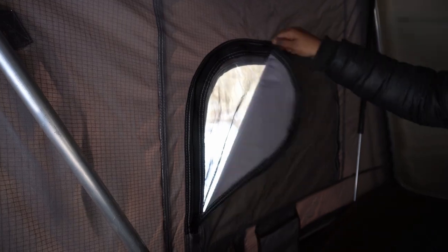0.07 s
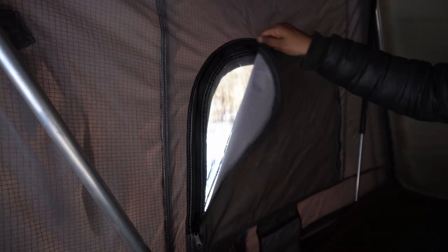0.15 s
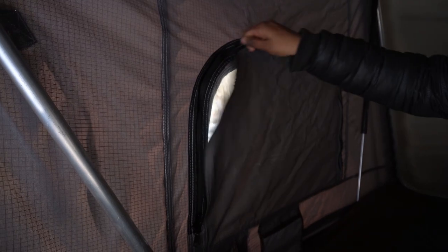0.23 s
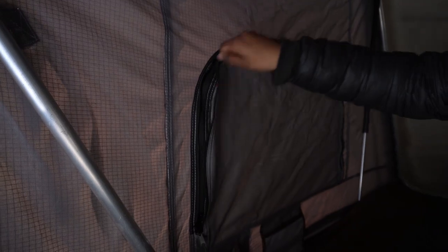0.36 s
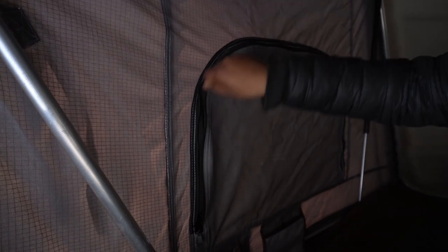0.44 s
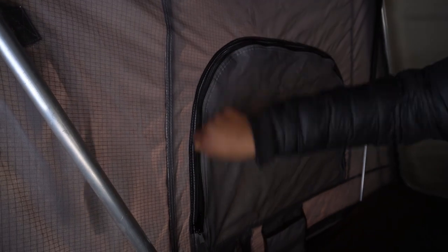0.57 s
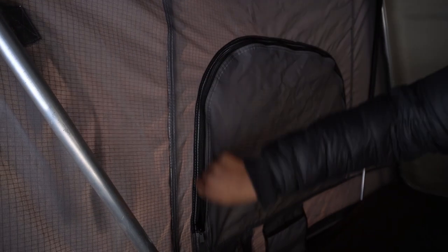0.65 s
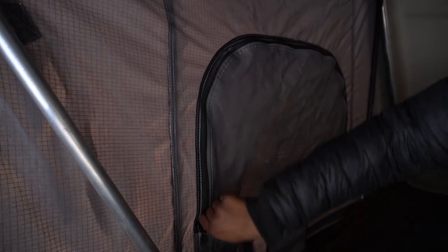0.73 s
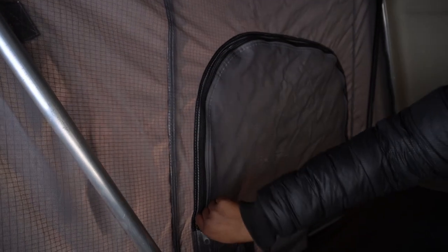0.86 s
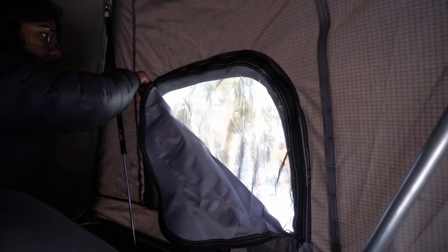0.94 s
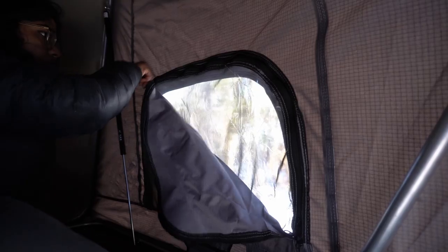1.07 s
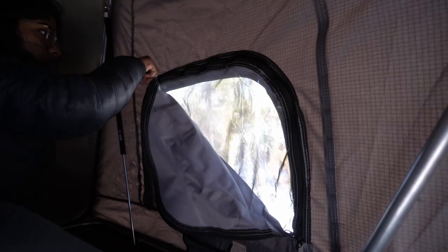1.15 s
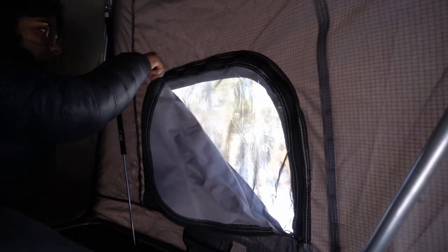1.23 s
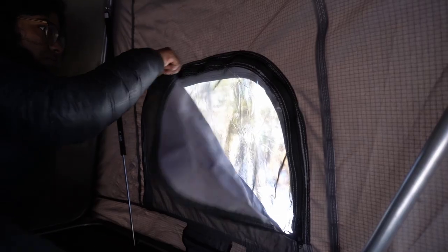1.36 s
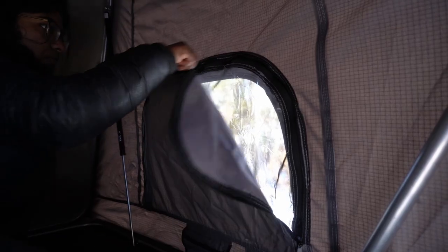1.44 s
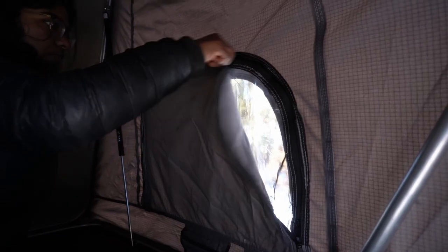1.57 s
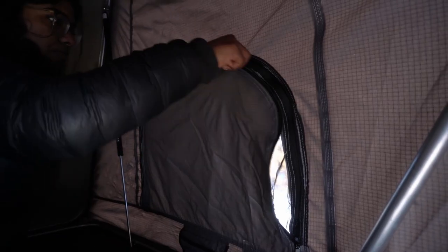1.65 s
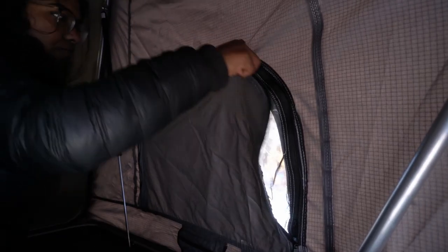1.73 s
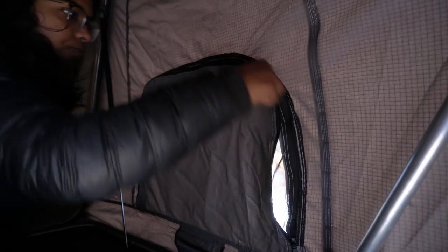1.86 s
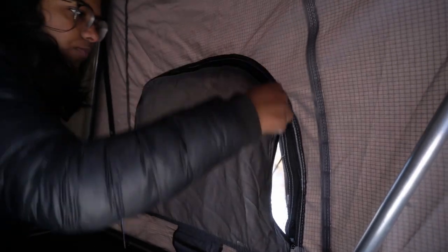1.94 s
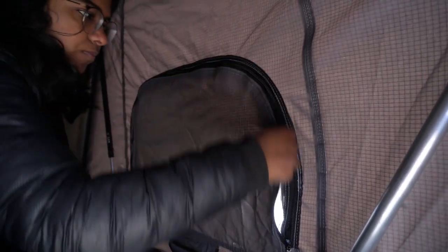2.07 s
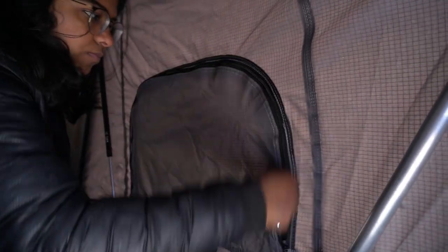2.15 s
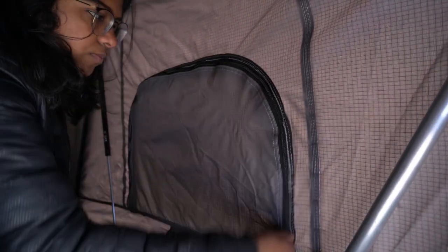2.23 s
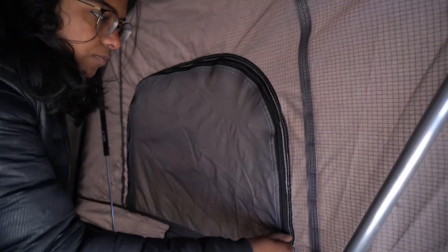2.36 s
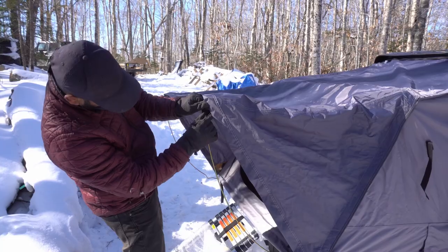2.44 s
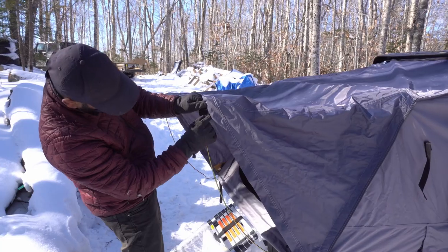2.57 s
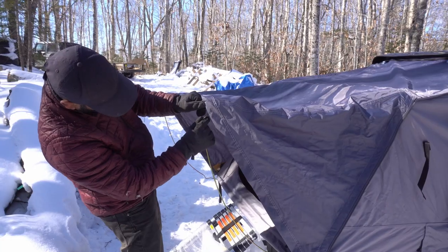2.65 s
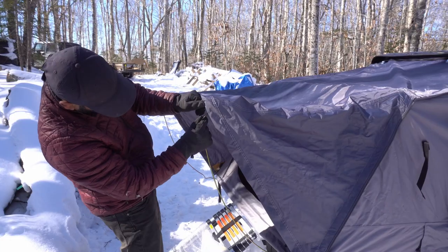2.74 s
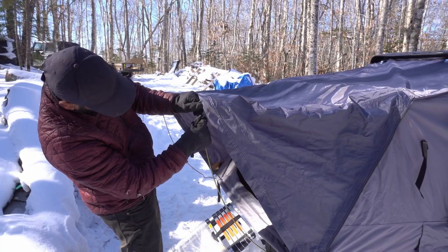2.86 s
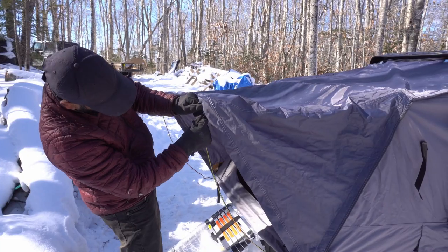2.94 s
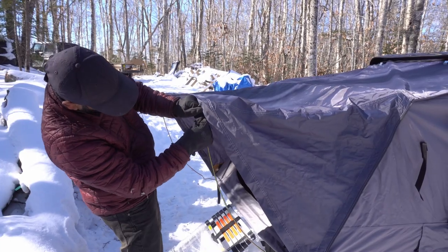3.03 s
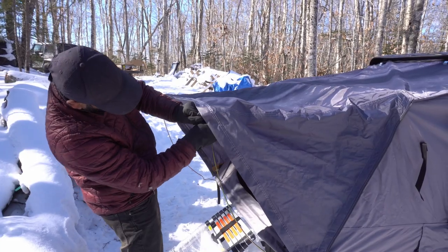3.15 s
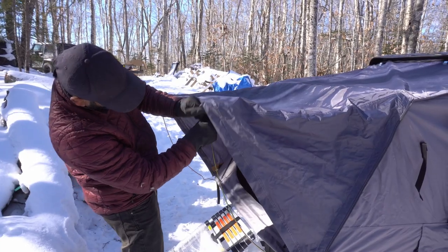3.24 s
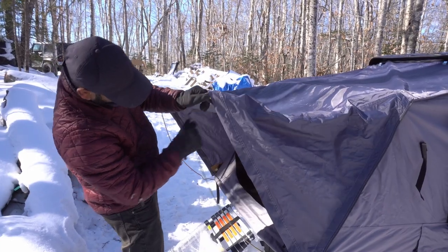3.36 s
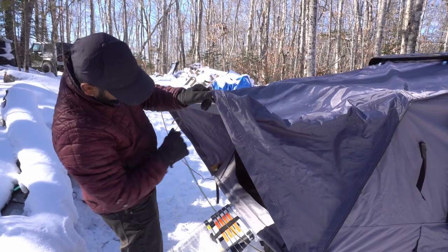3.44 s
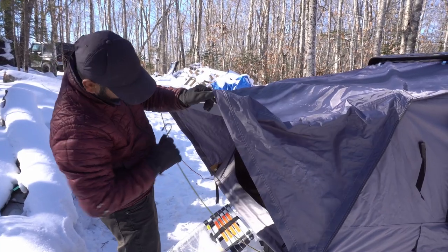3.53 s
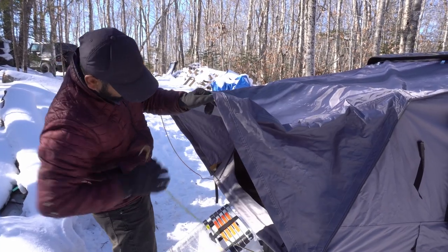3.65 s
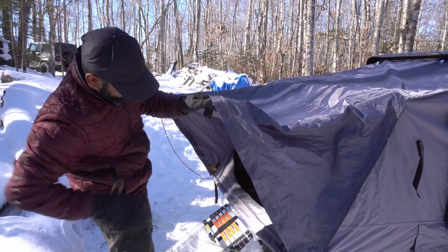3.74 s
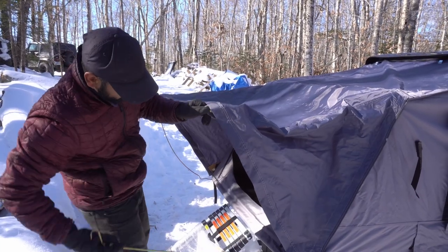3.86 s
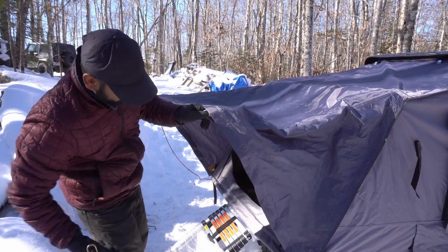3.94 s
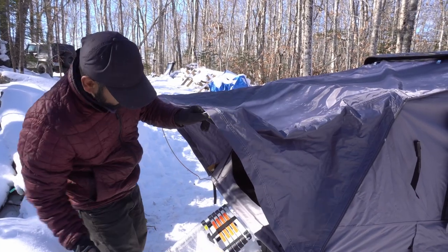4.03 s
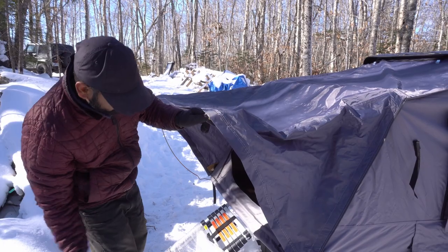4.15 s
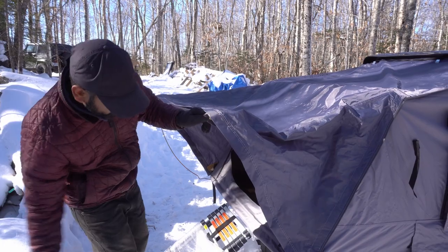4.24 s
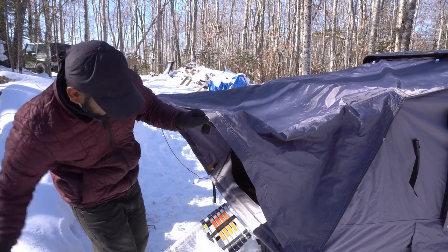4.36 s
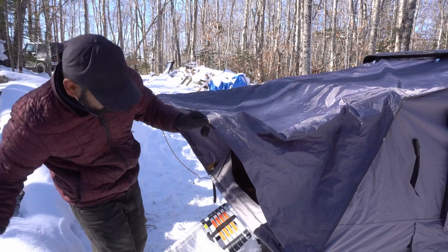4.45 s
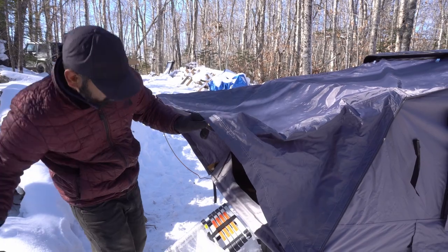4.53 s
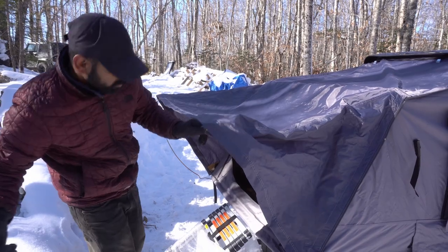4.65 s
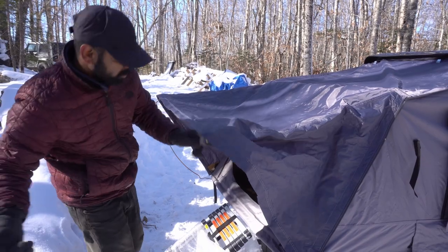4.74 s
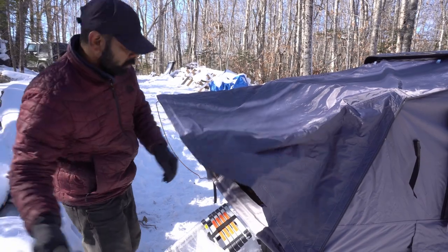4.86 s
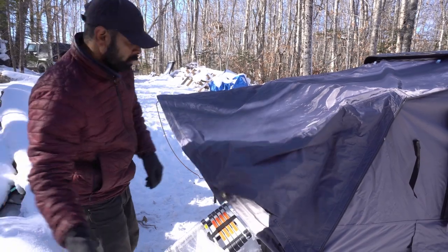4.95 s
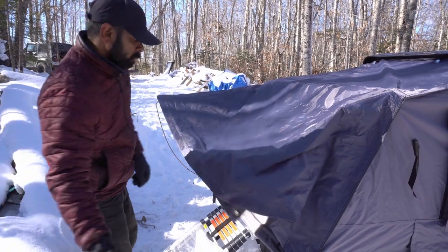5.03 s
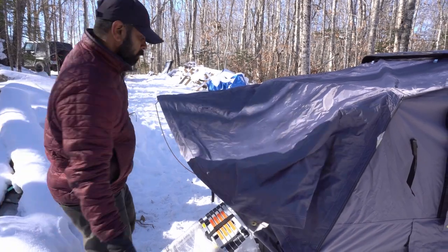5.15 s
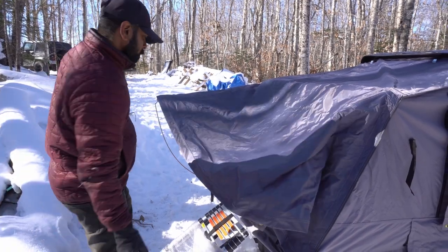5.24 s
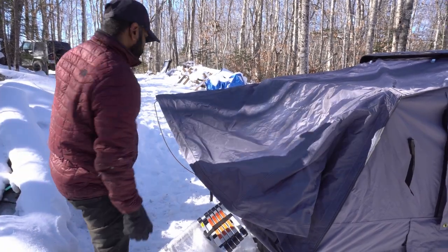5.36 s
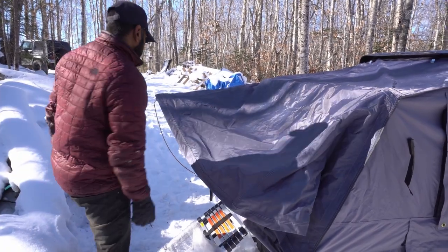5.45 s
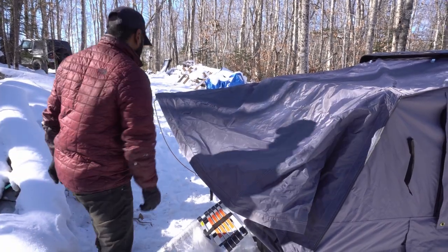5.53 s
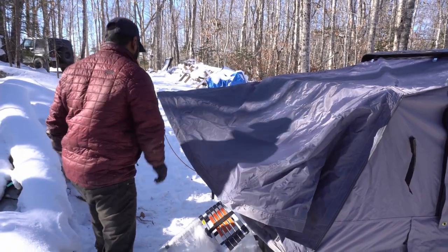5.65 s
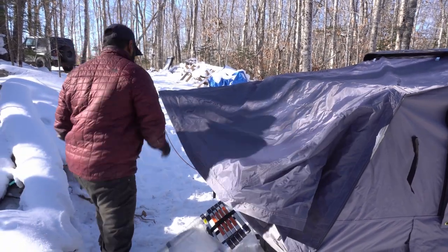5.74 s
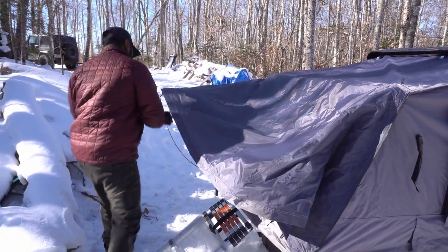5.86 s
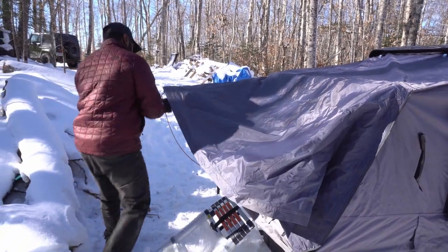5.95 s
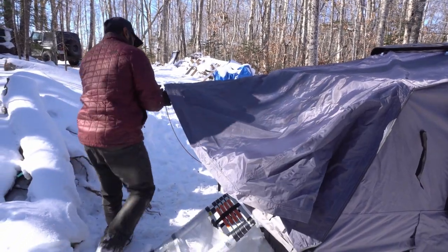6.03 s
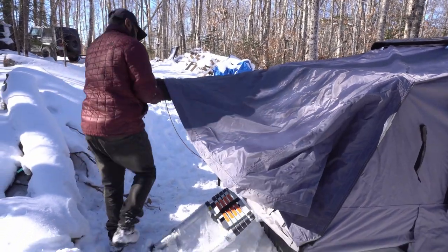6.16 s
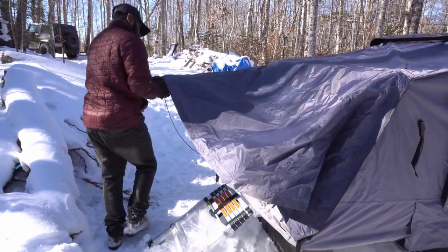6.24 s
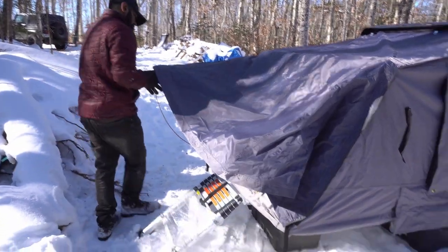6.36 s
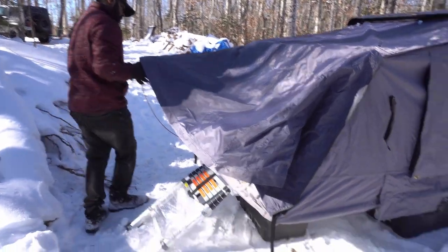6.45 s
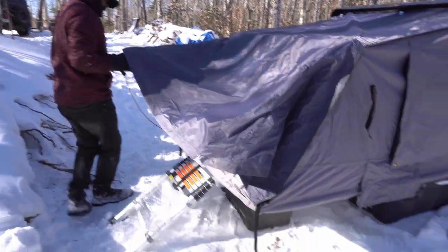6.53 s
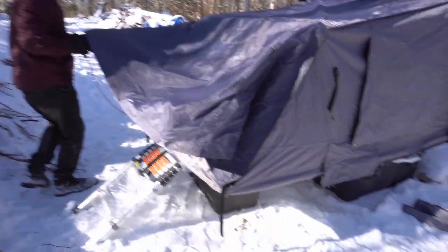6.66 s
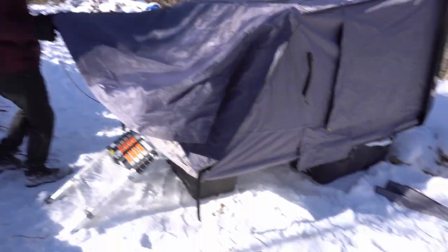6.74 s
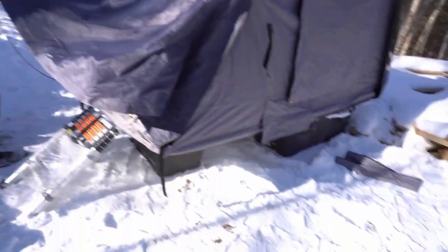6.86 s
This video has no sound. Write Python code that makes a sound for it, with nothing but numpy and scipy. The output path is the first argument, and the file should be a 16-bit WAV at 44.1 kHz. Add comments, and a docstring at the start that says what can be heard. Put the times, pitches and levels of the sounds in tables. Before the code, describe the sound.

Two tent-window zippers are pulled shut close by with buzzing rasps, then outdoors stiff cold fabric rustles and crackles while small metal pegs jingle briefly.

```python
"""A tent in the snow: two tent-window zippers are pulled shut close by, the slider tugging tooth after
tooth on a taut panel. Then outdoors: stiff cold fabric rustles and crackles, loose steel pegs jingle and
wind rumbles on the microphone. The zippers are tones and noise paced by the passing teeth, cloth and wind
are shaped flickering noise, creases are short damped tones and the steel is a sum of dying tones."""
import sys
import numpy as np
from scipy import signal
from scipy.fft import rfft, irfft, next_fast_len
from scipy.io import wavfile
from scipy.ndimage import uniform_filter1d, map_coordinates

SR = 44100
rng = np.random.default_rng(int(sys.argv[2]) if len(sys.argv) > 2 else 0)


def generate_wav(sig):
    """Save sig (samples, or channels by samples) to the path in sys.argv[1] as 16-bit PCM at SR."""
    pcm = np.round(np.clip(np.atleast_2d(sig).T, -1, 1) * 32767).astype(np.int16)
    wavfile.write(sys.argv[1], SR, pcm)


def boost(x):
    """Linear amplitude factor 10**(x/20) for a level x in decibels (scalar or array-like)."""
    u = np.asarray(x, float) / 20
    return 10 ** u


N = 304045  # samples in the scene

# the zipper's metal pull tab: strong modes [f/Hz, level/dB relative to each other],
# level of its many weak modes [dB], decay by 60 dB near 6 kHz [s], strikes [t/s, level/dB]
PULL_TAB = [(4059, -7), (10100, -1), (12600, -3)], -24, 0.13, [(.865, -45), (2.37, -35), (2.405, -43)]


def zipper():
    """Each tooth tugs the panel and scratches past the slider; a slow pull snags, scattering spacing and force."""
    # the two pulls, a list each: [t/s, speed/(teeth per s), tug level/dB before panel and trim]
    pulls = [
        [(0.0, 495, -34.5), (0.09, 400, -37), (0.188, 473, -36.5), (0.338, 448, -37), (0.388, 248, -39.5),
         (0.586, 560, -33.5), (0.63, 380, -33), (0.662, 597, -28.5), (0.704, 487, -29.5), (0.74, 606, -33.5),
         (0.8, 625, -31.5), (0.86, 433, -32.5), (0.885, 254, -63)],
        [(1.088, 243, -45), (1.17, 304, -24), (1.3, 297, -28), (1.4, 379, -25), (1.5, 460, -22.5),
         (1.58, 750, -26.5), (1.62, 613, -20.5), (1.66, 610, -24.5), (1.71, 475, -26), (1.77, 248, -41.5),
         (1.84, 130, -36.5), (1.92, 313, -29), (2.0, 370, -24), (2.105, 363, -33.5), (2.13, 498, -28),
         (2.25, 497, -25.5), (2.308, 733, -26), (2.358, 876, -24.5), (2.39, 500, -60)],
    ]
    # each zipper: [scratch level/dB at the usual tug and speed, share of uneven running when slow,
    # second multiple's level/dB against the tug tone, change of the higher multiples/(dB per octave)]
    zips = [(-40, .14, -1, -5), (-40.5, .5, -7, -5)]
    # how the taut cloth passes on the tug: [f/Hz, level/dB]
    taut_panel = [(60, 1), (250, 4), (900, -2.5), (1800, 0), (3000, -7), (6000, -8)]
    # colour of the scratch: [f/Hz, level/dB per Hz]
    scratch_colour = [(530, -4), (900, 0.5), (1840, -7), (2690, -2.5), (7410, -12), (15500, -23)]
    # drum tones of the panel: [f/Hz, level/dB per Hz]
    drum_colour = [(50, -34), (115, -6), (215, -9), (288, 3), (345, -10), (420, 5), (530, -12), (1000, -45)]
    # the slider catches: [t/s, level/dB]
    catches = [(.855, -38.5), (1.091, -47.5), (2.118, -34.5), (2.36, -24.5)]
    usual_tug_db, usual_teeth = -32, 450  # teeth per s
    free_teeth, free_uneven = 490, .13  # above this many teeth per s the slider runs freely

    rate, tug_db, gate = curves(*pulls)
    second_pull = (np.arange(N) / SR > pulls[0][-1][0]) * 1
    base_db, snag, second_db, fall_db = np.transpose(zips)[:, second_pull]
    uneven = free_uneven + (snag - free_uneven) / (1 + (rate / free_teeth) ** 10)

    # the scratch follows a share of the tug's dB and rises 4 dB per doubling of speed
    scratch_db = base_db + 0.32 * (tug_db - usual_tug_db) + 4 * np.log2(rate / usual_teeth)
    jitter = .24 * wobble(40) + .3 * wobble(150)
    teeth = np.cumsum(rate * np.exp(uneven * jitter)) / SR  # teeth passed so far
    force = boost(1.5 * wobble(30) + uneven * 3 * wobble(120))

    tug = np.sin(2 * np.pi * teeth)
    for k in range(2, 12):  # multiples of the tooth rate
        multiple_db = second_db + fall_db * np.log2(k / 2) + 4.1 * wobble(50)
        tug += boost(multiple_db) * np.sin(2 * np.pi * k * teeth + 0.77 * k)
    panel = coloured(boost(tug_db) * gate * force * np.sqrt(1 - uneven) * unit(tug), taut_panel)
    # snagging teeth beat the panel
    drum = boost(tug_db + 6.5) * uneven ** 1.97 * grains(drum_colour, spread_db=3.0, rate=30)

    burst = 1.0 + np.exp(-3.5 * (teeth % 1))  # the scratch peaks as a tooth seats
    flicker = boost(1.8 * wobble(500) + 3.1 * uneven * wobble(44.86))
    rub = near_wall(force * burst * flicker * rng.standard_normal(N))
    tab = sum(signal.lfilter(*signal.iirpeak(hz, 40, SR), rub) for hz, _ in PULL_TAB[0])
    # the pull tab rings along
    scratch = unit(coloured(rub, scratch_colour)) + boost(-27.0 + 2.3 * wobble(23.7)) * unit(tab)
    catch = swells([(s, db, 0.029) for s, db in catches], rise=.05)  # fade time 0.029 s
    return boost(-3.0) * panel + gate * (drum + (boost(scratch_db) + catch) * scratch)


def near_wall(x):
    """Adds an echo off the near cloth, whose delay wanders as the slider travels."""
    lag_ms = .55 * np.exp(.3 * wobble(4))
    return x + .35 * map_coordinates(x, [np.arange(N) - lag_ms * SR / 1000])


def tent(x):
    """The cloth walls answer with a short dull echo, made of softened noise that dies away."""
    echo_db, t60_s = -14, 0.12
    t = np.arange(SR // 3) / SR
    tail = uniform_filter1d(rng.standard_normal(len(t)), size=4) * boost(-60 * t / t60_s)
    return x + boost(echo_db) * signal.fftconvolve(x, tail / np.linalg.norm(tail))[:N]


def cloth():
    """Stiff fabric flaps low, rustles with small ticks in clumps and hisses where it slides."""
    # how hard the cloth is handled: [t/s, rustle level/dB before its two parts are mixed]
    handling = [(2.39, -76), (2.47, -69), (2.55, -49), (2.68, -69.5), (2.76, -61), (2.9, -73.5),
                (3.168, -69), (3.18, -45), (3.22, -50.5), (3.26, -47.5), (3.33, -53.5), (3.41, -44.5),
                (3.45, -53.5), (3.57, -62.5), (3.68, -50), (3.76, -56.5), (3.82, -53), (3.95, -56.5),
                (4.3, -60), (4.5, -85), (4.8, -62), (4.97, -52), (5.41, -47), (5.55, -52), (6.0, -57.5),
                (6.15, -84), (6.48, -53), (6.79, -59), (6.89, -42)]
    # colours of the low flap, the rustle and the sliding hiss, each: [f/Hz, level/dB per Hz]
    flap_colour = [(41, -45), (70, -0.5), (227, 0), (600, -12), (780, -29), (1320, -120)]
    rustle_colour = [(180, -24), (300, 3.5), (720, -1), (3690, -10), (15500, -32)]
    hiss_colour = [(1500, -2.5), (5000, -3.5), (15000, -13)]
    # extra flaps, then extra slides, each: [t/s, level/dB, fade/s]
    flaps = [(2.39, -35.5, 0.012), (3.19, -40, 0.023), (3.84, -51, 0.03), (3.95, -41, 0.017)]
    slides = [(3.26, -47, 0.023), (6.48, -49, 0.064)]

    rustle_db, gate = curves(handling)
    swing_db = rustle_db + 57  # above the usual rustle of -57 dB
    clump = 2.5 * wobble(30)  # dB
    # flap and hiss follow only a share of the rustle's swings
    flap_gain = boost(-60.5 + 0.34 * swing_db) + swells(flaps, rise=1)
    flap = flap_gain * grains(flap_colour, spread_db=4.0, rate=19)
    sweep = grains(rustle_colour, spread_db=3, rate=250)
    rustle = boost(rustle_db + clump) * (.85 * sweep + .9 * ticks(rate=220, pitch_hz=2100, size_db=3))
    slide_gain = boost(-82 + 0.46 * swing_db) + swells(slides, rise=1)
    hiss = slide_gain * boost(clump / 2) * grains(hiss_colour, spread_db=4.0, rate=64)
    return gate * (flap + rustle + hiss)


def cracks():
    """A crease buckles in a few damped cycles and a short scatter of noise; breaking frost is a bright tick."""
    # creases buckle: [t/s, level/dB before a common lift, f/Hz]
    creases = [(2.54, -29, 1390), (2.744, -32.5, 1080), (2.764, -37, 2490), (3.081, -35.5, 720),
               (3.39, -43, 1370), (3.485, -30, 1300), (3.65, -33, 1700), (3.675, -30.5, 1380),
               (3.693, -28, 1500), (3.728, -31, 1580), (3.799, -33.5, 1720), (4.014, -30.5, 1310),
               (4.141, -30.5, 2410), (4.189, -47, 1400), (4.281, -28, 1950), (4.318, -26, 1570),
               (4.349, -34.5, 1490), (4.363, -41, 2600), (4.409, -35.5, 1190), (4.45, -36, 1390),
               (4.561, -34.5, 1300), (4.59, -42, 1980), (4.678, -37.5, 1580), (4.926, -29, 1500),
               (4.943, -30, 2020), (4.95, -24.5, 2620), (4.986, -31.5, 920), (4.995, -26, 2500),
               (5.018, -26.5, 850), (5.123, -32, 3000), (5.128, -28, 820), (5.143, -26.5, 2220),
               (5.182, -24, 3660), (5.247, -30, 925), (5.269, -31, 4000), (5.275, -35, 970),
               (5.303, -48, 2400), (5.321, -18.5, 1350), (5.332, -27, 1200), (5.362, -28, 1620),
               (5.392, -27, 960), (5.405, -23, 1800), (5.412, -18, 1810), (6.335, -36, 1460),
               (6.83, -24, 1350), (6.839, -19.5, 1210), (6.872, -26, 1710), (6.881, -20.5, 1290)]
    # frost breaks off: [t/s, level/dB before the band filter]
    snaps = [(3.693, -24), (3.729, -40), (4.141, -38), (4.318, -25.5), (4.986, -25), (5.123, -32),
             (5.181, -25.5), (5.321, -26.5), (5.362, -27)]
    out, t = np.zeros(N + SR), np.arange(SR // 25) / SR
    for s, db, hz in creases:
        onset = 1 - np.exp(-t / 0.0002)
        body = np.sin(2 * np.pi * hz * t + 1.1) * np.exp(-t * hz * 1.03) * onset
        soft_noise = uniform_filter1d(uniform_filter1d(rng.standard_normal(len(t)), size=6), size=4)
        scatter = 0.66 * soft_noise * boost(-60 * t / 0.031)
        out[round(s * SR):][:len(t)] += boost(db + 3.5) * (body + scatter)
    bright = signal.butter(2, [2500, 9000], "band", fs=SR)
    for s, db in snaps:
        tick = signal.lfilter(*bright, rng.standard_normal(len(t)))
        out[round(s * SR):][:len(t)] += boost(db - 60 * t / 0.0077) * tick
    return out[:N]


def steel():
    """The pull tab and four loose pegs jingle; the first peg lands and the snow mutes its ringing."""
    # each peg: strong modes [f/Hz, level/dB relative to each other], level of its many weak modes [dB],
    # decay by 60 dB near 6 kHz [s], strikes [t/s, level/dB]
    peg_a = ([(5216, -37), (5324, -36), (5577, -38), (7537, -40), (7720, -38), (7133, -42), (8300, -40),
             (9386, -40), (11922, -38), (13075, -40), (13670, -38), (9955, -42), (3553, -45), (3790, -46),
             (4678, -43)], -8, 1.1, [(5.427, -34), (5.446, -43), (5.677, -48)])
    peg_b = ([(5669, -33), (5835, -35), (7232, -37), (9661, -31), (5195, -36), (6751, -39), (4290, -46),
             (3806, -47), (9050, -38), (11329, -38), (12760, -28), (13763, -33), (14140, -33)],
             -12, 0.5, [(5.711, -31), (5.762, -34), (5.8, -39), (5.913, -44)])
    peg_c = [(2740, -52), (5900, -59), (8950, -62), (9600, -59.5), (10745, -57), (12904, -61),
             (15499, -68)], -14.5, 0.48, [(4.278, -53)]
    peg_d = [(5890, 0)], -35, 0.92, [(4.364, -62), (5.913, -58)]
    lands_s, snow_db_per_s = 5.705, 115
    muted = boost(-snow_db_per_s * np.maximum(np.arange(N) / SR - lands_s, 0))
    return muted * metal(*peg_a) + sum(metal(*piece) for piece in (PULL_TAB, peg_b, peg_c, peg_d))


def metal(modes, weak_db, t60, strikes):
    """Every strike clicks and rings the piece's modes anew; high modes die sooner, split modes beat."""
    out, t = np.zeros(N + SR), np.arange(SR * 2 // 3) / SR
    strong_hz, strong_db = np.transpose(modes)
    crowd = rng.random(size=(150, 2))  # many weak modes of random pitch and level
    weak_hz = 2400 + 13400 * crowd[:, 0] ** 1.15
    crowd_db = weak_db - 12 * crowd[:, 1] + 14 * np.minimum(np.log2(weak_hz / 5000), 0)
    hz = np.r_[strong_hz, weak_hz][:, None]
    db = np.r_[strong_db - strong_db.max(), crowd_db][:, None]

    luck = rng.standard_normal((2, len(hz), 1))
    life = t60 * (6000 / hz) ** .25 * np.exp(-.4 * abs(luck[0]))  # luck only shortens it
    # two close neighbours of each mode make it beat
    beat = 1 + .7 * np.exp(2j * np.pi * 22 * luck[1] * t) + .5 * np.exp(-2j * np.pi * 35 * luck[0] * t)
    decay = boost(db - 60 * t / life) * np.exp(2j * np.pi * hz * t) * beat
    for s, strike_db in strikes:
        draw = rng.standard_normal((2, len(hz)))  # level and phase of each mode
        ring = np.imag((boost(1.0 * draw[0]) * np.exp(9j * draw[1])) @ decay)
        noise = uniform_filter1d(rng.standard_normal(len(t)), size=2)
        click = boost(weak_db + 12) * noise * boost(-60 * t / 0.081)
        out[round(s * SR):][:len(t)] += boost(strike_db) * (ring * (1 - np.exp(-t / 0.0018)) + click)
    return out[:N]


def air():
    """Wind rumbles on the microphone, as low noise that swells and fades, over a faint steady hiss."""
    # strength of the wind: [t/s, level/dB]
    wind = [(0, -49.5), (1.9, -47), (2.5, -45.5), (4.6, -45.5), (5.6, -55), (6.6, -45.5), (6.89, -41)]
    # colour of the hiss: [f/Hz, level/dB per Hz]
    air_colour = [(59, -28), (100, -8), (201, -11), (3770, -18.5), (15500, -33)]
    wind_db, _ = curves(wind)
    rumble_colour = [(5, 1), (20, 8), (45, -3.0), (100, -21), (300, -102)]  # f/Hz, level/dB per Hz
    rumble = grains(rumble_colour, spread_db=4.5, rate=3.79)
    hiss = grains(air_colour, spread_db=1, rate=4)
    return boost(wind_db) * rumble + boost(-63.5) * hiss


def unit(x):
    """Scaled to rms 1."""
    return x / np.sqrt(np.mean(x ** 2) + 1e-20)


def curves(*tables):
    """One value per sample for each column after the time, and a gate open only inside the tables."""
    t = np.arange(N) / SR
    s, *cols = np.transpose(np.concatenate(tables))
    gate = sum((t >= rows[0][0]) & (t <= rows[-1][0]) for rows in tables)
    return [np.interp(t, s, c) for c in cols] + [uniform_filter1d(gate * 1., size=300)]


def wobble(rate):
    """A smooth random curve, rate knots a second."""
    knots = rng.standard_normal(int(N * rate / SR) + 4)
    return map_coordinates(knots, [np.arange(N) * rate / SR])


def coloured(x, spectrum):
    """Sends x through a spectrum of (Hz, dB) points, joined by lines over log frequency."""
    m = next_fast_len(N + 8192)  # room for the filter to ring out
    f, db = np.transpose(spectrum)
    gain_db = np.interp(np.log(np.fft.rfftfreq(m, 1 / SR) + 1), np.log(f), db)
    return irfft(rfft(x, m) * boost(gain_db), m)[:N]


def grains(spectrum, spread_db, rate):
    """Noise of rms 1 whose level flickers at random, with rate knots a second."""
    return unit(coloured(rng.standard_normal(N) * boost(spread_db * wobble(rate)), spectrum))


def ticks(rate, pitch_hz, size_db):
    """Sparse sharp grains, together of rms 1: each a damped cycle or two, of random pitch and size."""
    draw = rng.random(size=(int(rate * N / SR), 3))  # place, pitch, size
    cycles = pitch_hz * np.exp(2 * draw[:, 1:2] - 1) * np.arange(256) / SR
    size = boost(-size_db * np.log(draw[:, 2:] + .02))
    shape = size * np.sin(2 * np.pi * cycles) * cycles * np.exp(-cycles / .5)
    where = (draw[:, :1] * N).astype(int) + np.arange(shape.shape[1])
    return unit(np.bincount(where.ravel(), shape.ravel(), N)[:N])


def swells(events, rise):
    """Gain that dies by 1/e in the fade time after each (s, dB, fade s) event; it rises in a share of that."""
    s, db, fade = np.transpose(events)[:, :, None]
    late = (np.arange(N) / SR - s) / fade
    return np.sum(boost(db) * np.exp(-np.maximum(late, -late / rise)), axis=0)


def scene():
    """All sources at one microphone; only the zippers sound inside the tent."""
    return (tent(zipper()) + cloth() + cracks() + steel() + air())[None]


def low_pass(x):
    """Removes everything above the highest recorded frequency."""
    return signal.sosfilt(signal.butter(12, 16990, fs=SR, output="sos"), x)


def record(dry):
    """The microphone rolls off at the top."""
    heard = coloured(dry[0], [(15750, 0), (15950, -22), (16500, -40)])  # f/Hz, level/dB
    return low_pass(heard[None])


dry = scene()
out = record(dry)
generate_wav(out)
```